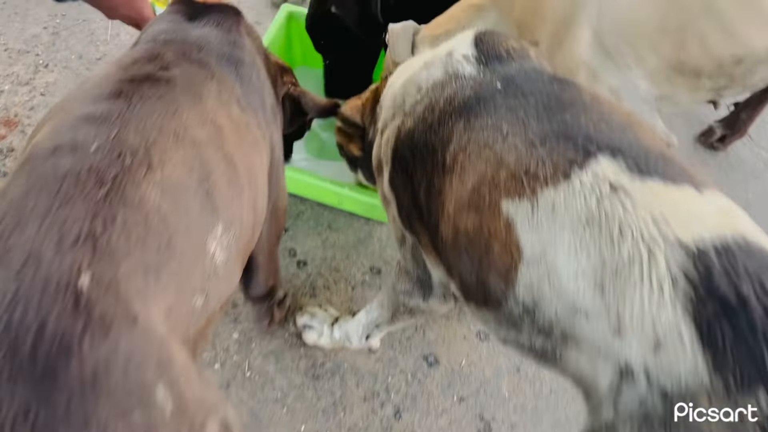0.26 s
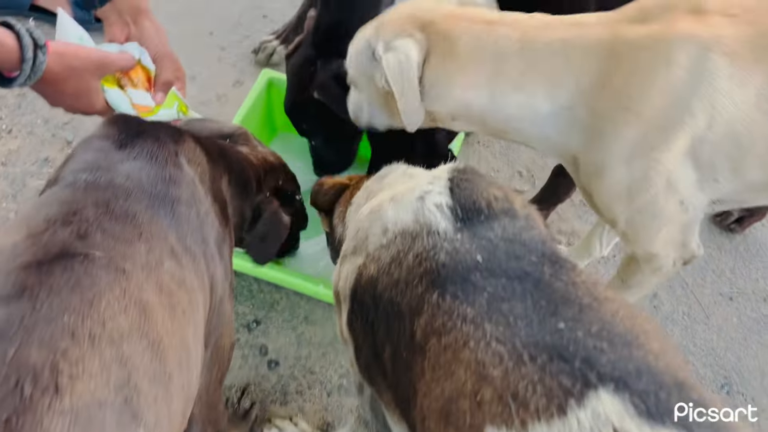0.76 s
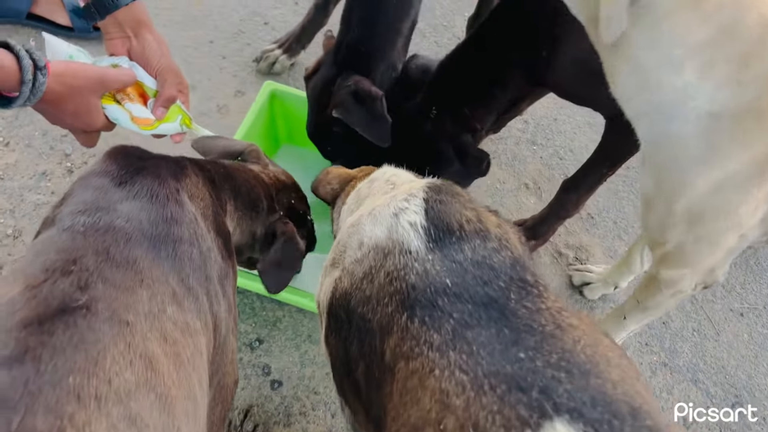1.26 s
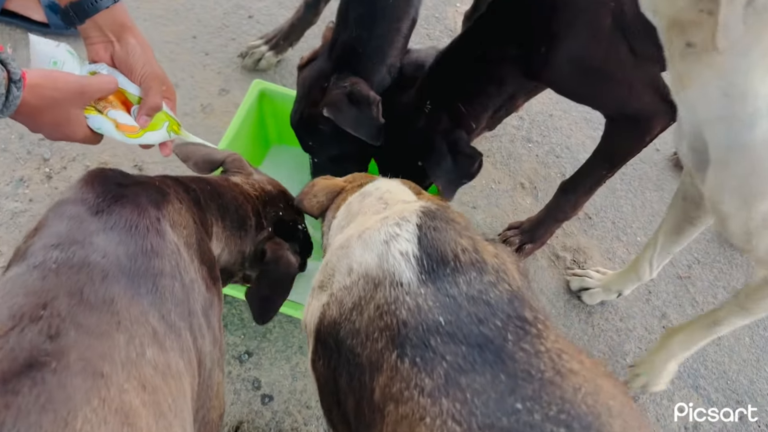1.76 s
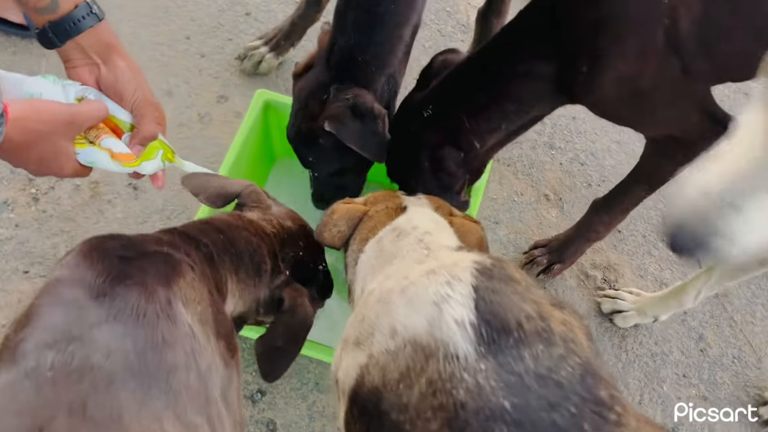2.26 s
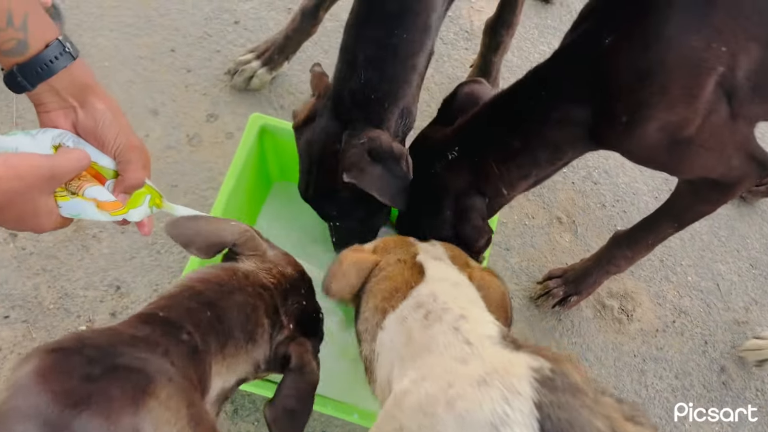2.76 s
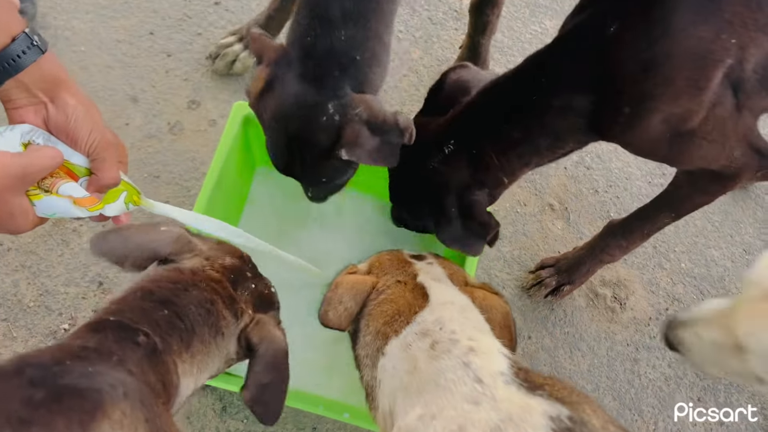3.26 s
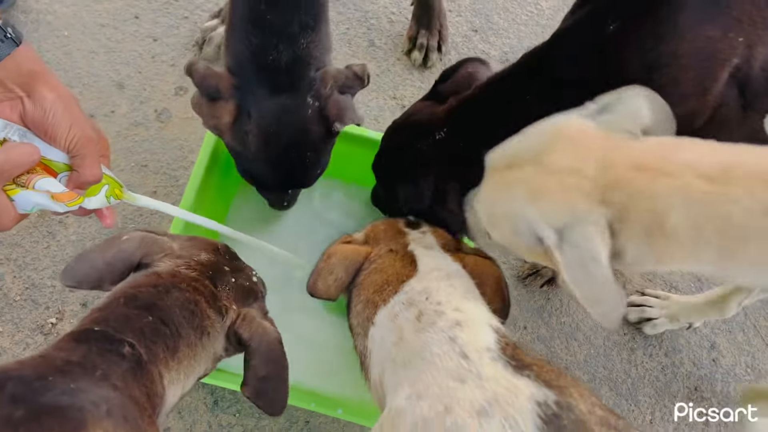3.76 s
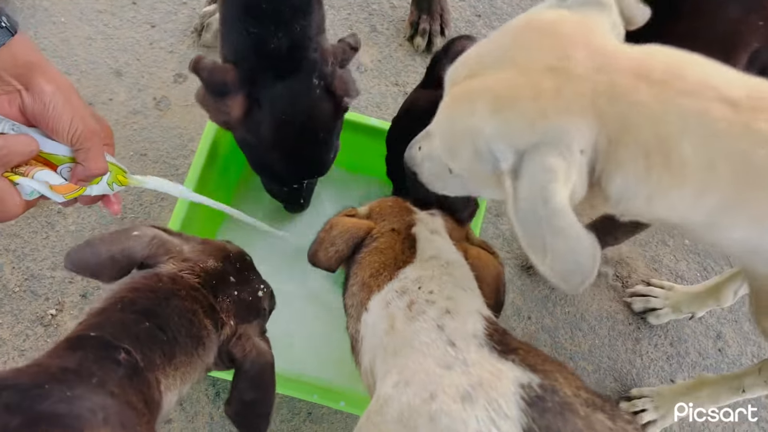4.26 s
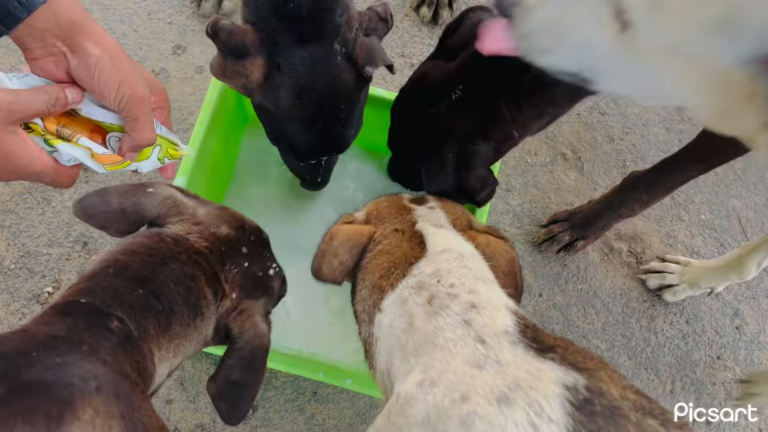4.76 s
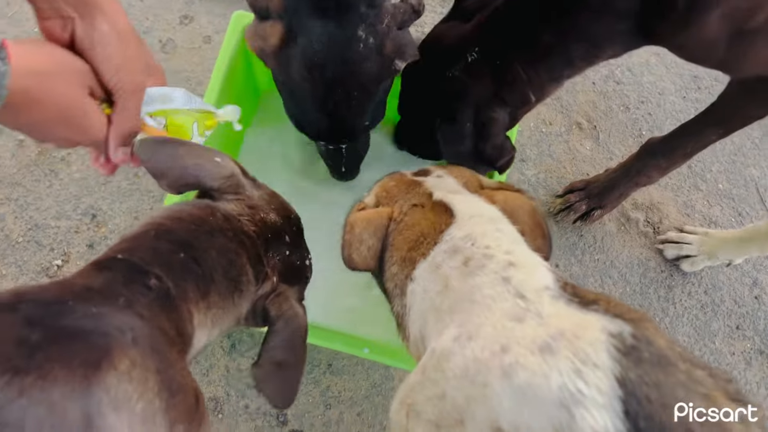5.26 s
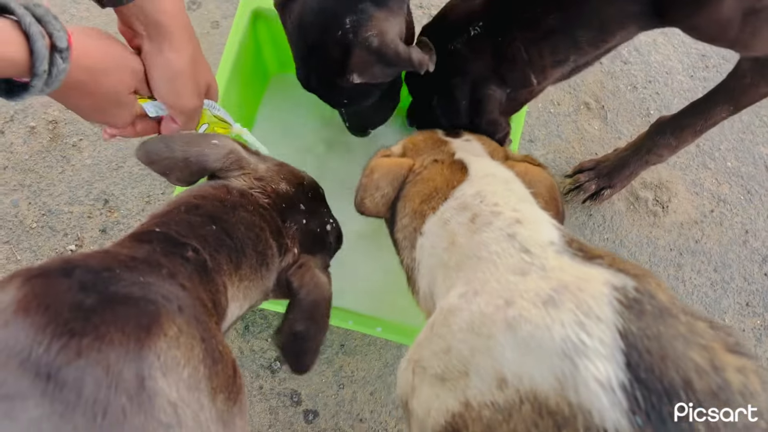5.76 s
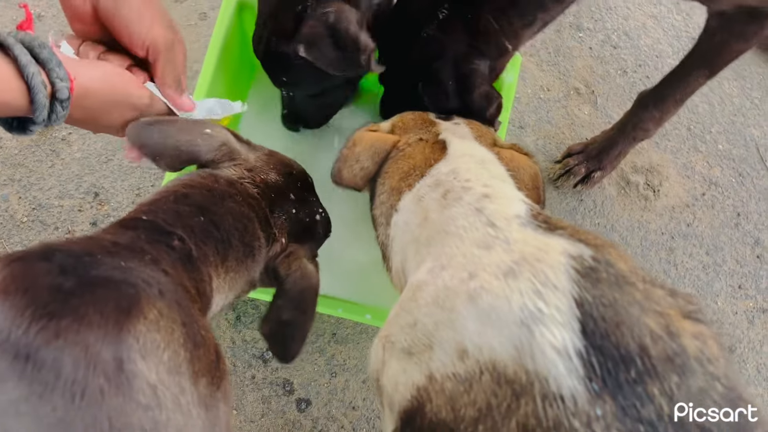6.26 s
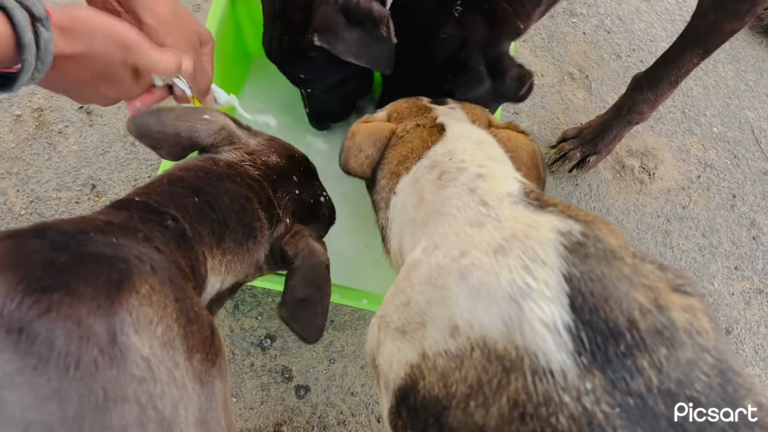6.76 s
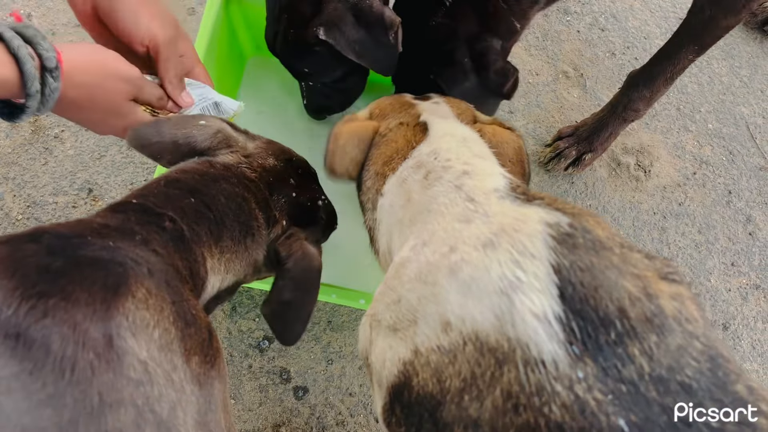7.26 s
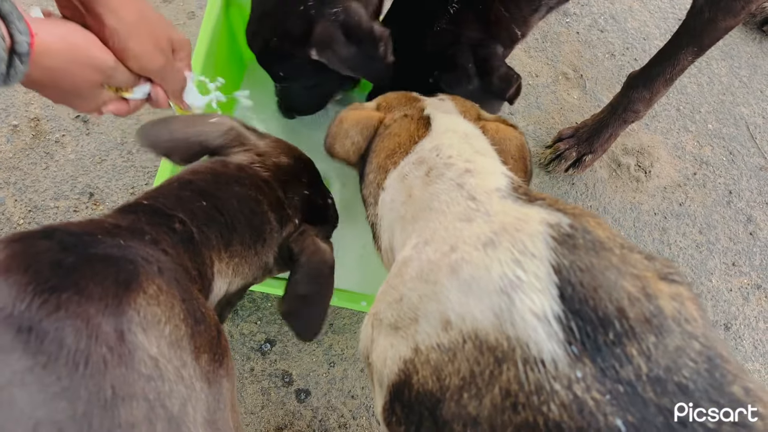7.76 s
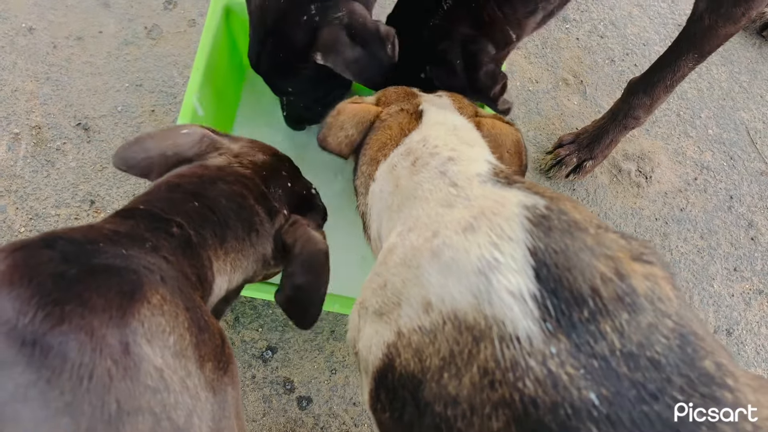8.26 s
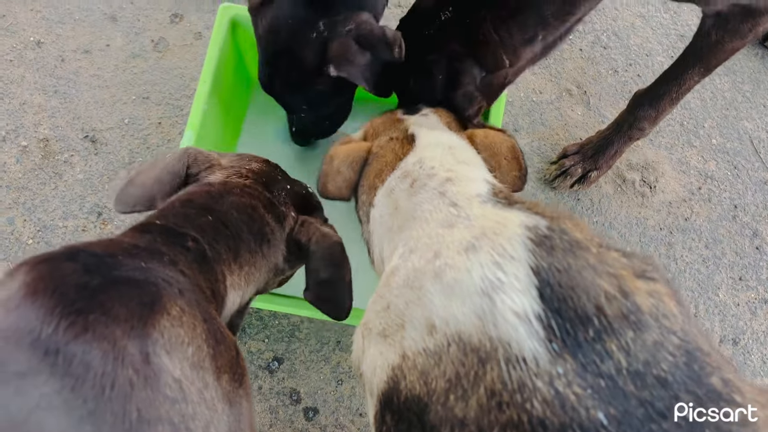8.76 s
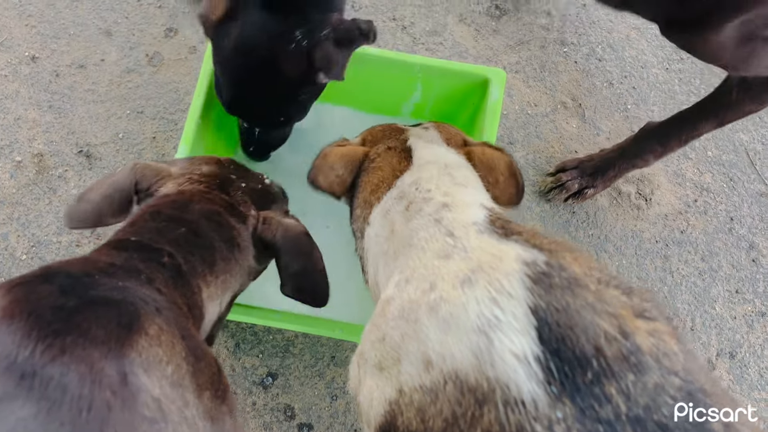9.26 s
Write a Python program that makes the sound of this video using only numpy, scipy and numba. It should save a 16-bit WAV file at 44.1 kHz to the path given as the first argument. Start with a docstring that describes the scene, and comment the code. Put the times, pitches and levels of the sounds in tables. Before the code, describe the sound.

Continuous overlapping dog lapping, heard close and slightly left: liquid plops, bubbly splashes and sharp tongue clicks, growing denser and wetter in the second half. Low wind gusts buffet the microphone with soft flutter and dull thuds. A lone high yelp, rough at first then clear, bursts out about a third of the way through, lasting under a fifth of a second. The open outdoor space adds only faint echo and dim air noise.

```python
"""Wind buffets the microphone from the start: a deep rumble, fluttering eddies and a few hard thumps.
Several dogs lap milk from a plastic tub outdoors: shaped noise and small bubbles splash, bigger bubbles
plop, and short cracks of noise with tiny ringing bubbles make the tongues smack.
One dog yelps once, built from wavering overtones and rasping noise, loud enough to push the
camera's limiter down for a moment. Faint outdoor noise and echoes surround it all."""
import sys
import numpy as np
from scipy import signal
from scipy.fft import rfft, irfft, next_fast_len
from scipy.io import wavfile
from scipy.ndimage import uniform_filter1d, minimum_filter1d, map_coordinates
from numba import njit

SR = 44100
rng = np.random.default_rng(int(sys.argv[2]) if len(sys.argv) > 2 else 0)


def put_to_file(sound):
    """Save the sound as 16-bit audio at rate SR, in the file named by the first command-line argument."""
    columns = np.atleast_2d(sound).T  # one column per channel
    safe = np.clip(columns, -1, 1)
    whole_steps = np.round(safe * 32767)
    wavfile.write(sys.argv[1], SR, whole_steps.astype(np.int16))


N = 418950
TIME = np.arange(N) / SR

# Levels in the tables are relative: each source adds its own trim.
# gusts on the microphone: (t/s, length/s, rise/s, rumble level/dB, buffet level/dB)
GUSTS = [(-0.08, 0.25, 0.07, -27.5, -28), (0.182, 0.47, 0.021, -28, -37), (0.657, 0.54, 0.07, -28, -29.5),
         (1.244, 0.17, 0.12, -20.5, -23.5), (1.45, 0.2, 0.034, -29.5, -31), (1.75, 0.15, 0.059, -28, -27.5),
         (2.043, 0.051, 0.1, -22.5, -22), (2.271, 0.345, 0.038, -21.5, -22),
         (2.68, 0.037, 0.25, -11.5, -18), (2.78, 0.55, 0.24, -23.5, -29.5), (3.612, 0.24, 0.096, -28, -28),
         (3.874, 0.46, 0.14, -26, -26.5), (4.394, 0.16, 0.034, -26, -28.5), (4.588, 0.41, 0.18, -23.5, -26),
         (5.113, 0.24, 0.051, -28.5, -32.5), (5.435, 0.26, 0.075, -29, -32), (5.93, 0.24, 0.16, -30, -30.5),
         (6.233, 0.2, 0.051, -24, -28.5), (6.526, 0.19, 0.039, -23.5, -27.5),
         (6.782, 0.13, 0.056, -21, -22.5), (7.041, 0.38, 0.019, -22, -25.5),
         (7.441, 0.19, 0.091, -23.5, -22.5), (7.697, 0.11, 0.062, -22.5, -28.5),
         (7.943, 0.019, 0.021, -32, -30.5), (8.026, 0.19, 0.027, -29.5, -37.5),
         (8.442, 0.61, 0.43, -33.5, -47), (8.794, 0.42, 0.17, -26.5, -29.5), (9.213, 0.15, 0.1, -28, -30)]
CALM_RUMBLE_DB, CALM_BUFFET_DB = -37, -47.5  # the breeze between gusts
GUST_FALL_S = 0.087
# size of the eddies as the camera turns in the wind: (t/s, corner f/Hz before each gust shifts it)
EDDY_TONE = [(0, 880), (1.8, 900), (2.3, 480), (4.9, 735), (6, 456), (7.1, 627), (8.4, 498), (9.5, 523)]
# single hard eddies: (t/s, level/dB, sharpness f/Hz, which scales the opening pitch sweep)
WIND_THUMPS = [(1.369, -12.5, 320), (1.567, -22.5, 540), (1.633, -18.5, 643), (2.085, -20, 320),
               (2.304, -7, 280), (2.345, -12.5, 297), (2.423, -9.5, 420), (2.489, -8.5, 437),
               (2.737, -12, 362), (3.168, -17.5, 579), (3.197, -13.5, 260), (4.064, -13, 266),
               (4.156, -18, 546), (4.276, -12, 547), (4.491, -20, 527), (5.166, -17, 230),
               (5.193, -14, 248), (5.327, -15.5, 416), (6.342, -9.5, 367), (6.817, -18, 333),
               (6.898, -11, 366), (7.349, -12, 423), (7.74, -15, 234), (7.984, -14.5, 448),
               (8.921, -15, 302), (9.011, -14.5, 370), (9.045, -15.5, 414), (9.205, -11, 347)]
# tone of the deep wind: (f/Hz, level/dB)
RUMBLE_TONE = [(15, -52), (28, -35), (40, -11), (52, -3.5), (75, -1), (110, -5), (160, -9), (300, -22),
               (800, -88)]
# tone of the distant outdoor noise: (f/Hz, level/dB)
AIR_TONE = [(30, -14), (70, 3.5), (200, -2), (500, -5), (1000, -14), (2500, -24), (6000, -27),
            (16000, -34.5)]

# a tongue plunges in, traps a bubble and stirs the milk:
# (t/s, plop level/dB, bubble f/Hz, slosh level/dB, spray level/dB)
LAPS = [(0.187, -36, 2380, -47.5, -53.5), (0.324, -35, 1380, -48, -55.5), (0.457, -33, 1030, -58, -50.5),
        (0.491, -31, 1500, -49, -64), (0.612, -37, 1220, -51.5, -61), (0.9, -30, 1026, -66, -62),
        (0.913, -27, 1020, -57, -54), (1.059, -38, 2540, -49.5, -51), (1.14, -29.5, 1530, -42, -55),
        (1.197, -30, 1450, -48, -51), (1.247, -27.5, 1130, -65, -71), (1.437, -44, 1100, -40.5, -54),
        (1.492, -26, 1020, -45, -53), (1.662, -24.5, 1140, -67, -55), (1.777, -31, 1520, -44, -66),
        (1.874, -36, 2230, -46.5, -68), (1.933, -32.5, 1320, -52, -74), (2.05, -43, 1650, -42, -53),
        (2.184, -29, 1080, -45, -57), (2.204, -39, 1140, -50, -56), (2.224, -27, 1247, -59, -61),
        (2.312, -25, 1510, -47, -53), (2.4, -44, 1500, -52, -47), (2.474, -27, 1560, -45, -52),
        (2.527, -34, 1100, -41.5, -50), (2.766, -30, 1180, -47, -50.5), (2.864, -35, 1030, -46, -53),
        (2.884, -34, 1249, -46.5, -49), (2.962, -33, 1180, -65, -54.5), (3.088, -31.5, 1070, -51, -49),
        (3.121, -31, 1280, -49, -62), (3.17, -31, 1090, -42, -49.5), (3.302, -40, 1550, -46, -53),
        (3.704, -43, 1330, -52, -50), (3.93, -32, 1740, -55, -58), (3.996, -32.5, 1420, -53, -54),
        (4.075, -47, 1380, -64, -51.5), (4.129, -21.5, 1032, -48, -46.5), (4.297, -28, 1340, -44.5, -49),
        (4.317, -28, 1570, -58, -62), (4.354, -29, 1380, -67, -68), (4.416, -26.5, 1970, -49, -50.5),
        (4.496, -38, 1090, -46, -48), (4.531, -44, 1360, -43, -53), (4.686, -33, 1140, -90, -69),
        (4.778, -40, 1280, -46, -54), (4.869, -38, 1260, -45, -44.5), (4.894, -28, 1430, -46, -64),
        (4.914, -33, 1050, -59, -65), (5.043, -29, 1340, -52, -47), (5.105, -34, 1300, -41, -52),
        (5.146, -38, 1800, -55, -65), (5.21, -30, 1210, -53, -51.5), (5.444, -34, 1740, -47, -50.5),
        (5.466, -30, 1480, -55, -47.5), (5.603, -24.5, 1680, -45, -58), (5.656, -28, 1400, -56, -63),
        (5.7, -32, 1430, -49.5, -48.5), (5.791, -36, 1400, -44, -59), (5.884, -23.5, 1160, -47, -49),
        (6.126, -21.5, 2070, -54, -60), (6.134, -18.5, 1206, -48, -62), (6.193, -26.5, 1140, -49.5, -66),
        (6.239, -24, 1220, -43.5, -51), (6.278, -28.5, 1190, -54, -51), (6.419, -26.5, 1260, -41.5, -51.5),
        (6.533, -29, 1310, -42, -48.5), (6.562, -25, 1020, -63, -65), (6.741, -53, 1346, -41.5, -46.5),
        (6.807, -45, 1486, -47.5, -52), (6.856, -29, 1300, -55, -66), (6.872, -26.5, 1280, -62, -88),
        (6.982, -25.5, 1750, -48, -56), (7.063, -27, 1450, -40.5, -44), (7.184, -22, 1510, -61, -50.5),
        (7.272, -28.5, 1255, -59, -70), (7.398, -26.5, 1295, -47, -47), (7.485, -33, 2070, -50, -51.5),
        (7.521, -25, 1400, -48, -64), (7.608, -33.5, 2150, -47.5, -74), (7.695, -33, 1330, -44.5, -50.5),
        (7.828, -28, 1200, -50, -60), (7.953, -28, 1480, -48.5, -60), (8.123, -29.5, 1450, -47, -51),
        (8.197, -26, 1460, -64, -65), (8.214, -20, 1330, -52, -66), (8.262, -34, 1150, -49, -62),
        (8.345, -47, 1281, -45.5, -53), (8.388, -30, 1220, -64, -65), (8.472, -44, 1200, -60, -63),
        (8.517, -25.5, 2490, -45.5, -50), (8.541, -27.5, 1410, -59, -60), (8.59, -27.5, 1270, -65, -71),
        (8.666, -33, 1320, -54, -55), (8.729, -27, 1370, -40, -46.5), (8.952, -35, 1340, -44, -52),
        (9.218, -30, 1230, -56, -47.5), (9.3, -51, 1500, -48.5, -50), (9.338, -32, 1020, -60, -64),
        (9.385, -30, 1220, -57, -55), (9.41, -32, 1600, -59, -68)]
# tone of the stirred milk: (f/Hz, level/dB)
SLOSH_TONE = [(350, -28), (750, 2), (1300, 0.5), (2000, -4), (3000, -7.5), (4500, -12.5), (8000, -23),
              (16000, -53)]
# tone of the fine spray: (f/Hz, level/dB)
SPRAY_TONE = [(1500, -16), (3000, 2.5), (4600, -2), (6500, -3), (9000, 0.5), (12000, -5), (16000, -6)]
SLOSH_RISE_S, SLOSH_HOLD_S, SLOSH_FALL_S = 0.017, 0.0053, 0.054
SPRAY_RISE_S, SPRAY_HOLD_S, SPRAY_FALL_S = 0.053, 0.011, 0.07
REST_SLOSH_DB, REST_SPRAY_DB = -56.5, -58.5  # the milk between laps
# the hollow left by the tongue closes with a weaker pop: average delay, and level against the plop
AFTER_POP_S, AFTER_POP_DB = .007, -12
# the mouth rings above each plop: pitch ratio and level
MOUTH_RATIO, MOUTH_DB = 1.55, -13

# the loudest wet smacks of lips and tongues: (t/s, level/dB, ring f/Hz, fine spit level/dB)
WET_SMACKS = [(0.4473, -30, 8820, -38), (0.794, -27, 4300, -44), (1.5, -27.5, 5000, -59),
              (1.7449, -54, 2820, -43), (1.777, -29, 4650, -45), (1.798, -26, 3670, -41),
              (1.8498, -34, 3860, -42), (1.8733, -25, 3420, -51), (1.894, -28, 4900, -57),
              (1.945, -28.5, 4400, -67), (2.4635, -30, 3600, -37), (2.771, -22.5, 3000, -60),
              (2.954, -45, 4620, -43.5), (3.1847, -24, 3600, -40), (3.679, -27, 7100, -42),
              (3.701, -37, 10000, -36), (3.7458, -27, 4080, -59), (3.929, -27, 4600, -65),
              (4.128, -42, 9200, -33), (4.1804, -24, 4770, -46), (4.231, -28.5, 3560, -43),
              (4.2645, -27, 3000, -37), (4.3522, -29, 2700, -51), (4.3914, -39, 4850, -40),
              (4.417, -24, 2800, -38), (4.748, -26.5, 4970, -38.5), (4.777, -28, 2970, -39),
              (4.7959, -22.5, 2930, -43), (4.842, -25, 3680, -41), (4.866, -23.5, 3560, -48),
              (5.0424, -37, 3030, -42), (5.105, -27, 4470, -38), (5.333, -28, 4200, -44),
              (5.5957, -24, 5230, -46), (5.7902, -23.5, 2820, -46), (5.8627, -23, 5060, -63),
              (6.015, -30, 3340, -58), (6.133, -28, 2650, -57), (6.1857, -30.5, 2930, -38),
              (6.266, -45, 3850, -38), (6.3025, -35, 3830, -40), (6.5424, -31, 3420, -39),
              (7.039, -26.5, 5030, -39), (7.219, -27, 3600, -54), (7.271, -20, 2800, -45.5),
              (7.397, -28.5, 3260, -54), (7.5136, -24.5, 5100, -40), (7.762, -29, 3240, -46),
              (7.8325, -22, 5100, -38), (8.012, -35, 3360, -36), (8.14, -27, 4000, -51),
              (8.196, -26, 2850, -49), (8.3835, -24.5, 3960, -50), (8.518, -29, 2510, -47),
              (8.6732, -26, 3500, -47), (8.902, -25, 3170, -47), (9.179, -22, 3680, -43),
              (9.2997, -28, 4100, -41)]
# tone of the crack in each smack: (f/Hz, level/dB)
SMACK_TONE = [(400, -17), (1300, 6.5), (3500, 0.5), (6500, -2.5), (10000, -12), (16000, -25)]

# the yelp: (t/s, pitch f/Hz, effort level/dB, roughness/0-1, overtone lift by the open mouth/dB)
YELP_SHAPE = [(3.333, 430, -38, .9, 2), (3.338, 440, -18, .8, 8), (3.348, 462, -8, .7, 4),
              (3.356, 475, -2, .58, -1), (3.365, 495, 1, .48, -4), (3.375, 511, -2, .52, 0),
              (3.384, 545, -2, .42, 6), (3.392, 548, -5, .45, 9), (3.399, 550, -1, .38, 5),
              (3.407, 598, 3, .18, -1), (3.416, 606, .5, .08, 2), (3.432, 606, .5, .06, -1),
              (3.446, 581, 0, .05, -4), (3.456, 559, 0, .05, -9), (3.466, 536, -3, .02, -15),
              (3.473, 506, -9, .15, -11), (3.479, 440, -21, .45, 3), (3.495, 420, -36, .7, 0)]
# resonances of the dog's throat: (f/Hz, level/dB)
THROAT_TONE = [(250, -52), (450, -4), (620, -5.5), (900, -32), (1130, -8), (1250, -6), (1400, -14.5),
               (1610, -16), (1750, -31), (2150, -41), (2400, -31.5), (2680, -22.5), (3000, -43),
               (3500, -41), (4300, -63), (6000, -50), (9000, -50), (16000, -72)]
HALF_TONE_DB, RASP_DB = -2, -8.5  # scaled further by the roughness

# the yard's answer: (f/Hz, time to fade by 60 dB/s)
YARD_FADE = [(200, .22), (1500, .11), (10000, .042)]
# walls that return the yelp: (delay/s, level/dB)
WALL_ECHOES = [(.021, -29), (.046, -36)]
# where the tub sits: (f/Hz, left minus right level/dB)
TUB_SIDE = [(300, 1), (1200, 5), (2400, 5.5), (4400, 2.5), (8000, .2)]
# stereo widening: (f/Hz, angle by which left leads/rad)
STEREO_PHASE = [(0, 0), (330, -.1), (520, -.8), (900, -1.2), (1200, -.6), (1700, 0), (2300, .5),
                (2900, 1.1), (3500, .3), (5200, 0), (6200, -1.3), (6800, -2.7), (7400, -4.9), (8400, -6.1),
                (9500, -6.5), (11200, -8.8), (12900, -9.9), (14200, -11.9), (15200, -12.6)]
TOP_HZ = 15950  # nothing is kept above this


def amp(db):
    """Decibels to gain."""
    return 10 ** (np.asarray(db) / 20)


def unit(x):
    """Scale x to an rms (average strength) of 1."""
    return x / np.sqrt(np.mean(x ** 2) + 1e-20)


def levelled(x, seconds):
    """Even out x so that its running rms stays at 1."""
    power = np.abs(uniform_filter1d(x ** 2, max(int(seconds * SR), 2)))
    return x / np.sqrt(power + 1e-12)


def along(points, hz):
    """Read (f/Hz, value) points at any frequency, on a log axis."""
    f, v = np.transpose(points)
    return np.interp(np.log(hz + 1), np.log(f + 1), v)


def curves(rows):
    """One value per sample for each column after the time."""
    s, *cols = np.transpose(rows)
    return [np.interp(TIME, s, c) for c in cols]


def wobble(rate):
    """A smooth random curve, with rate random points a second."""
    return map_coordinates(rng.standard_normal(int(N * rate / SR) + 4), [TIME * rate])


def filtered(x, response):
    """Change the strength and phase of each frequency in x."""
    m = next_fast_len(N + SR // 2)
    return irfft(rfft(x, m) * response(np.fft.rfftfreq(m, 1 / SR)), m)[..., :N]


def coloured(x, spectrum):
    """Shape x by a tone table, at an rms of 1."""
    return unit(filtered(x, lambda hz: amp(along(spectrum, hz))))


def add(track, s, sound):
    """Mix a sound into a track at time s."""
    part = track[max(round(s * SR), 0):][:len(sound)]
    part += sound[:len(part)]


def gusting(levels_db, calm_db):
    """Wind level in dB: each gust builds, holds and dies away over a light breeze."""
    power = np.full(N, amp(calm_db) ** 2)
    for (s, length, rise, *_), db in zip(GUSTS, levels_db):
        # a gust that began before the start is joined part-way
        t = np.arange(int((length + 5 * GUST_FALL_S) * SR)) / SR - min(s, 0)
        build = np.minimum(t / max(rise, .005), 1)
        fade = np.exp(-np.maximum(t - length, 0) / GUST_FALL_S)
        add(power, s, (amp(db) * build * fade) ** 2)
    return 10 * np.log10(power)


@njit
def moving_lowpass(x, step, damping):
    """Two resonant low-passes in a row, with a corner that moves."""
    out = np.zeros(len(x))
    a = da = b = db = 0.0
    for i in range(len(x)):
        da += step[i] * (x[i] - a - damping * da)
        a += step[i] * da
        db += step[i] * (a - b - damping * db)
        b += step[i] * db
        out[i] = b
    return out


def eddies(buffet_db, corner_hz, db_per_octave, lump_db):
    """Lumpy turbulence: a harder gust sheds smaller eddies and so sounds brighter."""
    lumps = wobble(110)
    octaves = (buffet_db + 25.0) / db_per_octave + 0.23 * lumps
    corner = np.clip(corner_hz * 2 ** octaves, 150, 1100)
    noise = rng.standard_normal(N) * amp(lump_db * lumps)
    flow = moving_lowpass(noise, 2 * np.pi * corner / SR, 1.31)

    def band(hz):
        low_cut = (1j * hz / (95 + 1j * hz)) ** 3
        return low_cut / (1 + 1j * hz / 320) / (1 + (hz / 1080) ** 8)

    return levelled(filtered(flow, band), seconds=0.11)


def thumping():
    """Hard eddies: each is one sharp push that slackens into a slow swing."""
    track, t = np.zeros(N), np.arange(SR // 25) / SR
    swell = (1 - np.exp(-t / 0.0015)) ** 2 * np.exp(-t / 0.0058)
    for s, db, hz in WIND_THUMPS:
        pitch = rng.uniform(80, 108) + 1.79 * hz * np.exp(-t / 0.00367)
        turns = np.cumsum(pitch) / SR
        add(track, s, amp(db + 7.0) * np.sin(2 * np.pi * turns) * swell)
    return track


def wind():
    """Air pressing on the microphone: rumble, eddies and thumps, mostly shared by both channels."""
    *_, rumbles, buffets = np.transpose(GUSTS)
    rumble_db = gusting(rumbles, CALM_RUMBLE_DB) - 0.66 + wobble(13)
    buffet_db = gusting(buffets, CALM_BUFFET_DB) + 0.11 + 0.89 * wobble(20)
    corner_hz = curves(EDDY_TONE)[0]
    rumble, buffet = [], []
    for layer in range(2):  # first the shared wind, then the difference between the channels
        deep = levelled(coloured(rng.standard_normal(N), RUMBLE_TONE), seconds=0.095)
        rumble.append(amp(rumble_db + 1.5) * deep)
        flow = eddies(buffet_db, corner_hz, db_per_octave=45, lump_db=2.5)
        buffet.append(amp(buffet_db + 0.5) * flow)
    mid = rumble[0] + buffet[0] + thumping()
    side = amp(-12.5) * rumble[1] + amp(-8.0) * buffet[1]
    return np.array([mid + side, mid - side])


def distant_air():
    """Faint steady outdoor noise, partly shared by the channels and partly their own."""
    noise = rng.standard_normal(N) + 1.25 * rng.standard_normal((2, N))
    return amp(-47.0) * coloured(noise, AIR_TONE)


def bubble(t, hz, cycles, rise):
    """A bubble swells and rings for a few cycles, its pitch rising as it nears the surface."""
    age = t * hz / cycles
    ring = np.sin(2 * np.pi * hz * t * (1 + rise * age / (1 + age)))
    return 1.3 * ring * np.exp(-age) * (1 - np.exp(-(3 * age) ** 2))


def bubbles(count, centre_hz, spread, cycles, scatter_db, size):
    """A cloud of bubbles of random time, pitch and strength, each size samples long."""
    when, pitch, strength = rng.random((count, 3)).T
    hz = np.clip(centre_hz * np.exp(spread * np.log(pitch / (1 - pitch))), 500, 15500)
    gain = amp(scatter_db * np.minimum(-np.log(1 - strength), 4))
    rings = gain[:, None] * bubble(np.arange(size) / SR, hz[:, None], cycles, rise=0.055)
    index = (when * N).astype(int)[:, None] + np.arange(size)
    return np.bincount(index.ravel(), rings.ravel(), N)[:N]


def slaps(count, scatter_db, decay):
    """Loudness of many little wet slaps, each sudden and quickly gone."""
    when, strength = rng.random((count, 2)).T
    gain = amp(scatter_db * np.minimum(-np.log(1 - strength), 3))
    blows = np.bincount((when * N).astype(int), gain, N)
    t = np.arange(SR // 25) / SR
    shape = np.exp(-t / decay) * (1 - np.exp(-t / 0.0021)) ** 2
    return unit(signal.fftconvolve(blows, shape)[:N])


def stirring(levels_db, rest_db, rise, hold, fall):
    """Gain of the wash: it swells as a tongue comes down and settles after the plunge."""
    power = np.full(N + SR, amp(rest_db) ** 2)
    t = np.arange(SR) / SR - .5  # half a second of room before each plunge
    surge = np.exp(np.minimum(t, 0) / rise - np.maximum(t - hold, 0) / fall)
    for (s, *_), db in zip(LAPS, levels_db):
        add(power, s, (amp(db) * surge) ** 2)
    return np.sqrt(power[SR // 2:][:N])


def wide_noise():
    """Noise from a spread-out source: mostly the same in both channels, partly their own."""
    return unit(rng.standard_normal(N) + .55 * rng.standard_normal((2, N)))


def splashing():
    """Stirred milk swells with every lap; little slaps accent its slosh and spray together."""
    *_, slosh_db, spray_db = np.transpose(LAPS)
    sloshing = stirring(slosh_db, REST_SLOSH_DB, SLOSH_RISE_S, SLOSH_HOLD_S, SLOSH_FALL_S)
    spraying = stirring(spray_db, REST_SPRAY_DB, SPRAY_RISE_S, SPRAY_HOLD_S, SPRAY_FALL_S)
    hits = slaps(count=420, scatter_db=4.2, decay=0.0048)
    froth = unit(bubbles(count=2200, centre_hz=1830, spread=0.28, cycles=3.6, scatter_db=3.2, size=600))
    slosh = coloured(.6 * froth + wide_noise(), SLOSH_TONE)
    slosh = slosh * (0.78 + 0.46 * hits) * amp(2.1 * wobble(45))
    fizz = unit(bubbles(count=2600, centre_hz=6700, spread=0.3, cycles=6, scatter_db=2, size=450))
    spray = coloured(fizz + 1.23 * wide_noise(), SPRAY_TONE)
    spray = spray * (0.55 + 0.77 * hits) * amp(0.94 * wobble(220))
    wash = amp(4.0) * sloshing * levelled(slosh, seconds=0.145)
    return wash + amp(1.16) * spraying * levelled(spray, seconds=0.11)


def plops():
    """A tongue slaps in and traps a big bubble that rings a few cycles; a weaker pop follows."""
    rings, splash, t = np.zeros(N), np.zeros(N), np.arange(SR // 12) / SR
    burst = (1 - np.exp(-t / 0.0008)) * np.exp(-t / 0.008)
    for (s, db, hz, *_), (life, pitch, lag) in zip(LAPS, rng.random((len(LAPS), 3))):
        cycles = 3.4 + 1.5 * life + 1.6 * amp(db + 20)  # louder bubbles ring longer
        age = t * hz / cycles
        turn = 2 * np.pi * hz * t * (1 + .07 * np.minimum(age, 2))
        tone = np.sin(turn) + amp(MOUTH_DB) * np.sin(MOUTH_RATIO * turn)
        body = 1.3 * (1 - np.exp(-4 * age)) * np.exp(-age ** 1.7) * tone
        add(rings, s - .001, amp(db) * body)
        pop = bubble(t, hz * (1 + .5 * pitch), cycles=2.9, rise=0.053)
        add(rings, s + AFTER_POP_S * (.5 + lag), amp(db + AFTER_POP_DB) * pop)
        add(splash, s - .002, amp(db - 16.0) * burst)
    return rings + splash * coloured(rng.standard_normal(N), SLOSH_TONE)


def smacks():
    """A wet smack: a short crack of noise, a tiny ringing bubble and a spit of droplets."""
    rings, cracks, spits = np.zeros((3, N))
    t = np.arange(SR // 20) / SR
    snap = np.exp(-np.abs(t - .01) / 0.00089)
    trail = np.exp(-np.abs(t - .014) / 0.007)
    for s, db, hz, spit_db in WET_SMACKS:
        add(rings, s, amp(db - 5) * bubble(t, hz, cycles=6.5, rise=0.04))
        add(cracks, s - .0085, amp(db - 10.5) * (snap + 0.28 * trail))
        add(spits, s - .0085, amp(spit_db + 4.5) * (snap + 0.069 * trail))
    crack = coloured(rng.standard_normal(N), SMACK_TONE)
    spit = coloured(rng.standard_normal(N), [(4000, -30), (9000, -3), (16000, -9)])
    return rings + cracks * crack + spits * spit


def yelp():
    """Vocal folds beat unevenly at half pitch as it rises, clear into a whine, fall and break off."""
    on = (TIME > YELP_SHAPE[0][0]) & (TIME < YELP_SHAPE[-1][0])
    hz, effort_db, rough, mouth_db = [c[on] for c in curves(YELP_SHAPE)]
    shaky_hz = hz * (1 + (.005 + .05 * rough) * wobble(700)[on])
    phase = 2 * np.pi * np.cumsum(shaky_hz) / SR
    k = np.arange(2, 41)[:, None] / 2  # multiples of the pitch, in half steps
    # tones halfway between the overtones sound only while the voice is rough
    weight = np.where(k % 1, amp(HALF_TONE_DB) * rough * (k > 2), 1)
    # every tone flutters on its own in level and phase
    flutter = np.array([wobble(260)[on] for tone in k])
    drift = np.array([wobble(220)[on] for tone in k])
    smear = (.1 + .4 * rough) * np.minimum(k - 1, 4) * drift  # higher tones stray more
    # the overtones fade as the mouth closes, and the high ones as the voice clears
    octaves_up = np.log2(np.minimum(k, np.where(mouth_db < 0, 3, 2)))
    dull_db = mouth_db * octaves_up ** (2 - 2 * rough) - 2.5 * (1 - rough) * (k > 3)
    dull_db = np.maximum(dull_db, -20)
    tone_db = along(THROAT_TONE, k * hz) + dull_db + 4.5 * rough * flutter
    folds = (weight * amp(tone_db) * np.sin(k * phase + smear)).sum(axis=0)
    # rasping noise pulses at a third of the pitch
    rasp = coloured(rng.standard_normal(N), THROAT_TONE)[on] * (1 + .6 * np.cos(phase / 3))
    voice = np.zeros(N)
    mix = np.sqrt(1 - rough ** 2) * folds + amp(RASP_DB) * (rough + .03) * rasp
    voice[on] = amp(effort_db) * mix
    return amp(0.2) * voice


def yard(x):
    """The faint answer of the ground and walls: fading noise, different in each channel."""
    hz, t, z = signal.stft(rng.standard_normal((2, SR // 3)), SR, nperseg=256)
    fade = amp(-60 * t / along(YARD_FADE, hz)[:, None])
    tail = signal.istft(z * fade, SR, nperseg=256)[1]
    return signal.fftconvolve(np.atleast_2d(x), tail / np.linalg.norm(tail[0]), axes=1)[:, :N]


def walls(x):
    """A few separate reflections, duller than the sound itself."""
    def response(hz):
        echoes = sum(amp(db) * np.exp(-2j * np.pi * hz * s) for s, db in WALL_ECHOES)
        return echoes / (1 + (hz / 2500) ** 2)

    return filtered(x, response)


def scene():
    """The tub a little to the left, the yelp nearly ahead, wind right on the microphone."""
    sides = np.array([[.5], [-.5]])  # left, right
    blow, air = wind(), distant_air()
    drinking, dog = splashing() + plops() + smacks(), yelp()
    tub = filtered(drinking, lambda hz: amp(sides * along(TUB_SIDE, hz)))
    direct = dog * amp(1.8 * sides) + tub
    dog_echo = yard(amp(-24) * dog) + walls(dog)
    sound = direct + yard(amp(-9.5) * drinking) + dog_echo + air + blow
    # the two channels are out of step by an angle that changes with frequency
    return filtered(sound, lambda hz: np.exp(1j * sides * np.interp(hz, *np.transpose(STEREO_PHASE))))


def limiter(x, top_db, hold, release_db):
    """The gain drops at a loud peak, holds, then climbs back at release_db a second."""
    need = np.minimum(top_db - 20 * np.log10(np.abs(x).max(axis=0) + 1e-9), 0)
    half = int(hold * SR / 2)
    held = minimum_filter1d(need, 2 * half + 1, origin=half)
    gain_db = np.minimum.accumulate(held - release_db * TIME) + release_db * TIME
    # smooth the gain so that it eases down just before the peak
    return x * amp(uniform_filter1d(minimum_filter1d(gain_db, size=129), size=129))


def record(dry):
    """The camera limits loud peaks and keeps nothing above its band limit."""
    limited = limiter(dry, top_db=-1.0, hold=0.17, release_db=68)
    return filtered(limited, lambda hz: hz < TOP_HZ)


dry = scene()
out = record(dry)
put_to_file(out)
```